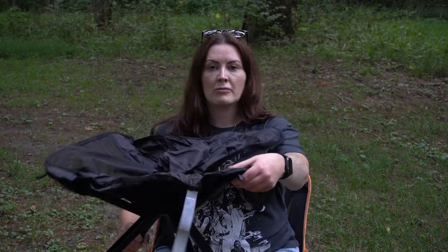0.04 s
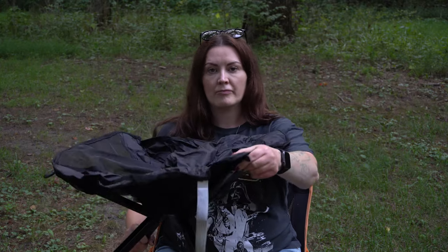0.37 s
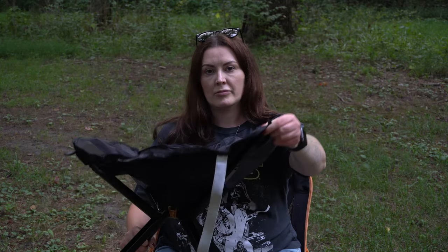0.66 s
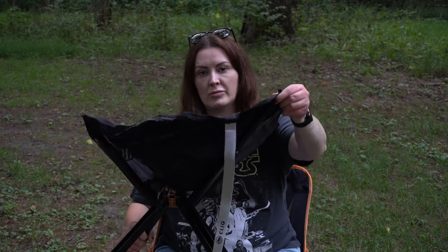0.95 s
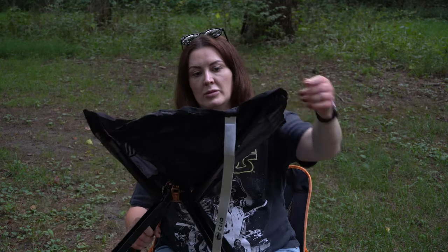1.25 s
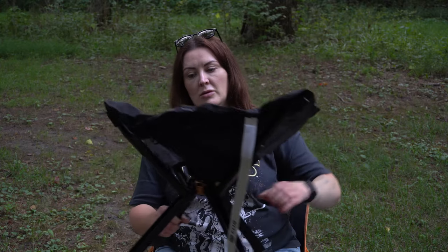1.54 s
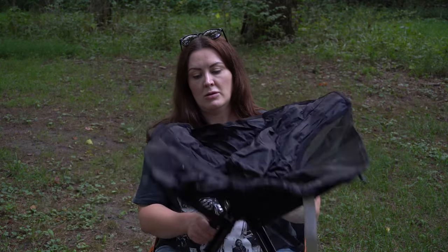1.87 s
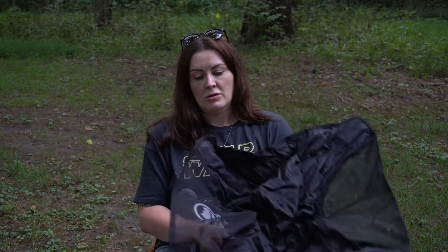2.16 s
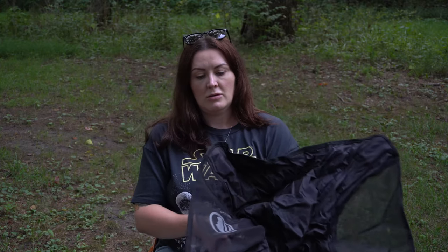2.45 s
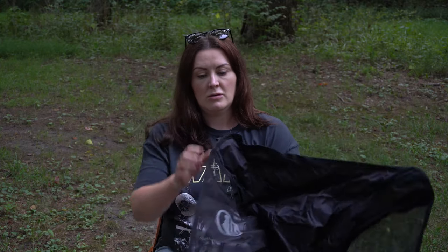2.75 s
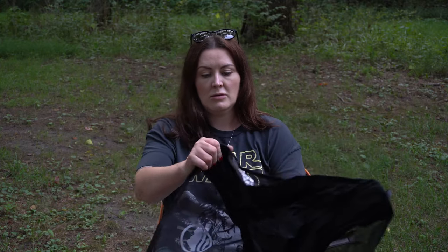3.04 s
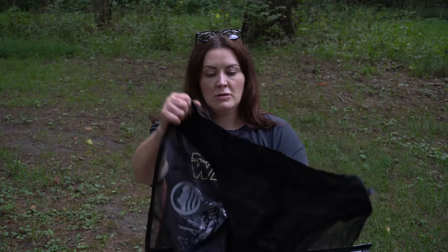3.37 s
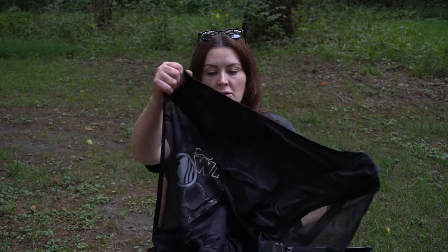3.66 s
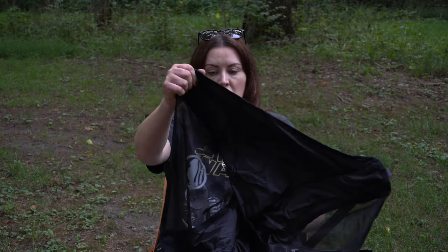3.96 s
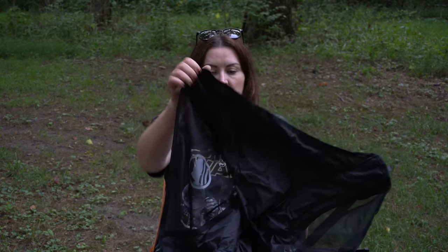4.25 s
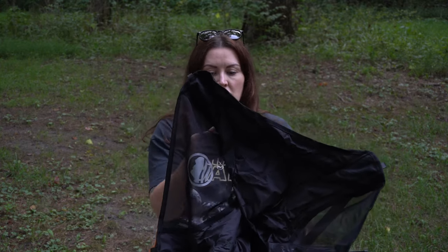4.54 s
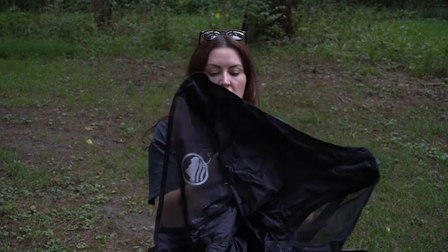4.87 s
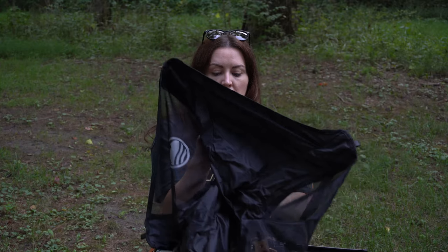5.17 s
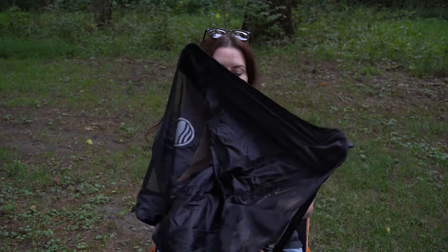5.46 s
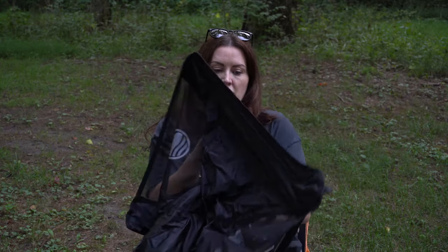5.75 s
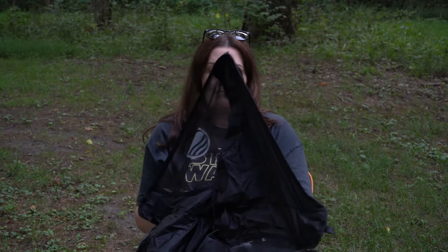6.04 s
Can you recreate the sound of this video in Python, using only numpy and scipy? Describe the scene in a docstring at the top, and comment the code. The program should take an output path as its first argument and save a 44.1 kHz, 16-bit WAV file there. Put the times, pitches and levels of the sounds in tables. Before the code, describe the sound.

Someone unfolds a camp chair outdoors, near the microphone. Its nylon seat crumples and hisses in short tugs while the hollow tubes knock. The joints lock with three sharp snaps, one early, one midway and one late, the last with a brief ring. Behind it, faint birdsong, a high ticking insect and a soft low rumble fill the woods, with a slight echo from the trees.

```python
"""Birds whistle and an insect ticks in phrases of six over the faint rumble of a forest clearing.
Close by, a folding camp chair is opened: each tug knocks a hollow tube and rustles the nylon seat.
Its joints snap home three times, and a few blows leave the long tubes ringing.
Trunks and leaves scatter the sounds back."""
import sys
import numpy as np
from scipy import signal
from scipy.fft import rfft, irfft
from scipy.io import wavfile
from scipy.ndimage import uniform_filter1d

SR = 44100
rng = np.random.default_rng(int(sys.argv[2]) if len(sys.argv) > 2 else 0)


def int16_out(signal):
    """Quantize to a 16-bit WAV file."""
    q = np.round(np.clip(np.atleast_2d(signal).T, -1, 1) * 32767)
    wavfile.write(sys.argv[1], SR, q.astype(np.int16))


N = 269451
TIME = np.arange(N) / SR


def amp(db):
    """Decibels to gain."""
    return 10 ** (np.asarray(db) / 20)


def unit(x):
    """Scale to rms 1."""
    return x / np.sqrt(np.mean(x ** 2) + 1e-20)


def read(points, hz):
    """Interpolate on a log-frequency axis."""
    points_hz, values = np.transpose(points)
    return np.interp(np.log(hz + 1), np.log(points_hz + 1), values)


def add(mix, time_s, sound):
    """Mix a sound in at time_s."""
    part = mix[max(round(time_s * SR), 0):][:len(sound)]
    part += sound[:len(part)]


def colour(x, spectrum):
    """Filter by a spectrum; rms 1."""
    hz = np.fft.rfftfreq(len(x), 1 / SR)
    return unit(irfft(rfft(x) * amp(read(spectrum, hz)), len(x)))


def drift(rate_hz):
    """Smooth random wander; rms 1."""
    width = max(int(SR / rate_hz), 1)
    return unit(uniform_filter1d(uniform_filter1d(rng.standard_normal(N), width), width))


def patchy(x, depth_db, size=512):
    """Patches of the spectrum, a few hundred hertz wide, come and go; rms 1."""
    bands = signal.stft(x, nperseg=size)[2]
    patches = uniform_filter1d(rng.standard_normal(bands.shape), size=4, axis=0)
    patches = unit(uniform_filter1d(patches, size=6, axis=1))
    return unit(signal.istft(bands * amp(depth_db * patches), nperseg=size)[1][:N])


# Hush and rumble spectra: (frequency [Hz], relative density [dB])
HUSH_SPECTRUM = [(100, -6), (200, 0), (400, -5.5), (800, -1.5), (1400, -11), (2400, -10), (3800, -14),
                 (5200, -25), (8000, -26.5), (12000, -29.5), (16000, -39)]
RUMBLE_SPECTRUM = [(20, -20.5), (40, -7), (62, 1.5), (95, 2.5), (125, -4.5), (170, -14), (300, -34),
                   (1000, -86.5)]
# Rumble envelope: (time [s], relative level [dB])
RUMBLE_ENVELOPE = [(0, -63.5), (1.05, -62.5), (1.22, -56), (1.5, -57), (2.6, -62), (2.8, -53), (3.0, -64),
                   (3.35, -53), (4.15, -59.5), (4.55, -50), (5.05, -59), (5.3, -57), (5.55, -63.5),
                   (5.85, -54), (6.1, -53.5)]


def air(hush_db=-70, rumble_gain_db=-3, lump_db=4.5):
    """The woods' wavering hush over a lumpy low rumble."""
    hush_gain = amp(hush_db + 1.2 * drift(rate_hz=2))
    hush = patchy(colour(rng.standard_normal(N), HUSH_SPECTRUM), depth_db=5.5, size=1024)
    gust_db = np.interp(TIME, *np.transpose(RUMBLE_ENVELOPE)) + lump_db * drift(rate_hz=26)
    rumble = colour(rng.standard_normal(N), RUMBLE_SPECTRUM)
    return hush_gain * hush + amp(rumble_gain_db + gust_db) * rumble


def whistle(length_s, first_hz, middle_hz, last_hz, waver):
    """Soft-edged tone; the fluttering pitch arches through three points."""
    progress = np.linspace(0, 1, max(int(length_s * SR), 8))
    arch_hz = np.polyval(np.polyfit([0, .5, 1], [first_hz, middle_hz, last_hz], 2), progress)
    flutter = waver * unit(uniform_filter1d(rng.standard_normal(len(progress)), size=120))
    phase = 2 * np.pi * np.cumsum(arch_hz * (1 + flutter)) / SR
    return unit(np.sin(phase) * np.sin(np.pi * progress))


# Slurred notes: (time [s], length [s], pitch [Hz], start above pitch [fraction], relative level [dB])
CAROL_NOTES = [(0, 0.029, 2727, 0.23, -52.5), (.104, 0.054, 2170, 0.21, -57), (.2, .07, 2694, -0.05, -54),
               (.413, 0.078, 2925, .02, -45), (.494, 0.096, 2478, -0.0034, -46.5),
               (.96, 0.12, 2170, 0.1, -58.5), (1.058, .058, 2917, 0.14, -55),
               (1.124, .069, 2143, 0.21, -51.5), (1.401, .039, 3314, 0.087, -55),
               (1.435, .033, 2756, 0.18, -52.5), (1.628, 0.046, 2507, 0.09, -56),
               (2.013, 0.068, 2960, 0.029, -57.5), (2.027, 0.051, 2500, 0.12, -56),
               (2.644, 0.057, 3400, 0.085, -53.5), (2.782, 0.042, 3047, 0.11, -50.5),
               (3.139, 0.097, 2496, 0.14, -50.5), (3.426, 0.078, 2884, -0.091, -51.5),
               (3.497, 0.0743, 2520, -0.063, -48), (4.039, 0.21, 2858, -0.094, -51.5),
               (4.165, 0.13, 2452, 0.035, -46), (4.666, 0.057, 3313, 0.12, -52),
               (4.694, 0.054, 2937, .1, -45.5), (4.756, 0.12, 2345, 0.091, -48.5),
               (4.874, 0.11, 2008, 0.016, -60.5), (5.148, .06, 2340, .1, -52.5),
               (5.226, 0.088, 2753, -.13, -49), (5.78, 0.053, 2194, -0.12, -68)]


def carolling_bird(overshoot=.23):
    """A songbird slides onto each pitch and levels off just past it."""
    out = np.zeros(N)
    for time_s, length_s, hz, slide, db in CAROL_NOTES:
        note = whistle(length_s, hz * (1 + slide), hz, hz * (1 - overshoot * slide), waver=.028)
        add(out, time_s, amp(db) * note)
    return out


# Calls: (time [s], relative level [dB])
CALLS = [(.058, -54.5), (1.095, -57), (1.3, -60), (1.492, -63), (2.045, -58), (2.318, -62.5)]
# Parts of a call: (delay [s], length [s], first [Hz], middle [Hz], last [Hz], relative level [dB])
CALL_PARTS = [(0, 0.043, 5300, 3918, 3169, -2.5), (0.059, .03, 3380, 3910, 4337, -5.5)]


def calling_bird():
    """A second bird repeats one call: sweep down, flick up."""
    out = np.zeros(N)
    for time_s, db in CALLS:
        for delay_s, length_s, *pitches_hz, part_db in CALL_PARTS:
            add(out, time_s + delay_s, amp(db + part_db) * whistle(length_s, *pitches_hz, waver=.011))
    return out


# Bouts of phrases: (start [s], end [s], phrase period [s], stroke period [s])
INSECT_BOUTS = [(.059, .45, .156, .0221), (.504, 3.05, .1539, .0221), (3.134, 6.11, .1638, .0234)]


def insect(stroke_db=-70, strokes=6):
    """Phrases of wing strokes, each a falling chirp; the last bout is a little slower."""
    out = np.zeros(N)
    for start_s, end_s, phrase_s, stroke_s in INSECT_BOUTS:
        for time_s in np.arange(start_s, end_s, phrase_s):
            for k, jitter_db in enumerate(rng.standard_normal(strokes)):
                chirp = whistle(length_s=.0155, first_hz=6480, middle_hz=6480, last_hz=5750, waver=.006)
                onset_s = time_s + k * stroke_s - len(chirp) / SR / 2
                add(out, onset_s, amp(stroke_db + jitter_db) * chirp)
    return out


# Echo spectrum, mostly treble off the leaves: (frequency [Hz], relative level [dB])
ECHO_SPECTRUM = [(200, -19.5), (1000, -2.5), (2500, -2), (4000, -7.5), (5200, -3.5), (6500, 4.5),
                 (7600, 0.5), (9300, 6.5), (11000, -4.5), (15000, 2)]
# Echo decay: (frequency [Hz], t60 before stretch [s])
ECHO_DECAY = [(200, 0.23), (1500, 0.14), (4000, 0.39), (7000, 0.22), (9500, 0.3), (11500, 0.41),
              (15500, 0.16)]


def trees(x, build_s, stretch, trunk_gain=0, trunk_s=.041, echoes_per_s=5000):
    """Echoes off trunks and leaves build, then die band by band; trunk_gain adds the nearest trunk."""
    t = np.arange(SR) / SR
    swell = np.minimum(.25 + t / build_s, 1)
    trunk = trunk_gain * np.exp(-((t - trunk_s) / .003) ** 2)
    taps = (swell + trunk) * rng.standard_normal(SR) * (rng.random(SR) < echoes_per_s / SR)
    hz, delay_s, bands = signal.stft(taps, SR, nperseg=256)
    t60_s = stretch * read(ECHO_DECAY, hz)[:, None]
    bands *= amp(read(ECHO_SPECTRUM, hz)[:, None] - 60 * delay_s / t60_s)
    tail = signal.istft(bands, SR, nperseg=256)[1]
    return signal.fftconvolve(x, tail / np.linalg.norm(tail))[:N]


BLOW_SAMPLES = 8192
BLOW_HZ = np.fft.rfftfreq(BLOW_SAMPLES, 1 / SR)


def blow(t60_s, spectrum_db, attack_s):
    """Burst of contact chatter, coloured by the struck part's spectrum over BLOW_HZ."""
    t = np.arange(BLOW_SAMPLES) / SR
    envelope = amp(-60 * t / t60_s) * (1 - np.exp(-t / attack_s))
    envelope /= envelope.max()
    chatter = rng.standard_normal(BLOW_SAMPLES)
    for _ in range(3):  # hard contacts drive all frequencies alike
        flat_spectrum = np.exp(1j * np.angle(rfft(chatter * envelope)))
        chatter = irfft(flat_spectrum) / np.maximum(envelope, .1)
    log_gain = np.log(amp(np.maximum(spectrum_db, spectrum_db.max() - 80)))
    mirrored = np.r_[log_gain, log_gain[-2:0:-1]]
    minimum_phase = np.exp(np.conj(signal.hilbert(mirrored)))[:len(BLOW_HZ)]
    sound = irfft(rfft(chatter * envelope) * minimum_phase)
    return sound * np.linalg.norm(envelope) / np.linalg.norm(sound)


# Hollow tube resonances: (centre [Hz], width [Hz], lift [dB])
TUBE_RESONANCES = [(1100, 150, 8), (2000, 1200, 6), (2600, 79, 4.5), (3850, 1200, 7)]


def knock_spectrum_db(low_hz, high_hz):
    """The band a contact excites, lifted by the hollow tube's resonances."""
    band_db = -10 * np.log10((1 + (low_hz / (BLOW_HZ + 1)) ** 6) * (1 + (BLOW_HZ / high_hz) ** 13))
    return band_db + sum(lift_db / (1 + (2 * (BLOW_HZ - centre_hz) / width_hz) ** 2)
                         for centre_hz, width_hz, lift_db in TUBE_RESONANCES)


# Tugs, each a knock and a rustle; relative levels: (time [s], knock [dB], knock t60 [s],
# knock low edge [Hz], knock high edge [Hz], rustle length [s], crumple [dB], hiss [dB])
CHAIR_TUGS = [(0.246, -40.5, 0.027, 1970, 3900, .03, -52, -80),
              (0.606, -48.5, 0.035, 280, 397, 0.019, -71, -72),
              (0.6508, -9.5, 0.0057, 556, 3610, 0.047, -37, -45.5),
              (1.254, -54.5, 0.055, 300, 520, 0.036, -70, -87),
              (1.7671, -36, 0.017, 1000, 2770, 0.12, -62, -82),
              (2.162, -42.5, 0.023, 2480, 6200, 0.033, -64, -49),
              (2.2151, -31.5, 0.064, 2235, 6200, .03, -59, -30),
              (2.295, -33, 0.03, 2216, 4500, 0.033, -53, -52.5),
              (2.524, -53, 0.066, 280, 560, .06, -68, -84.5),
              (2.602, -32, 0.027, 1296, 3500, 0.099, -46, -77.5),
              (2.7353, -34.5, 0.013, 900, 3000, .04, -62.5, -82.5),
              (2.9878, -24.5, .016, 1735, 3430, 0.068, -48.5, -75),
              (3.196, -32.5, 0.032, 2300, 6500, 0.046, -40.5, -43.5),
              (3.258, -35, 0.013, 1500, 4070, .02, -48, -45),
              (3.3112, -22.5, 0.02, 635, 4400, 0.053, -40.5, -40),
              (3.546, -32.5, 0.0051, 905, 4500, 0.049, -41, -49),
              (3.56, -25, 0.011, 600, 3660, 0.051, -39.5, -58),
              (3.7453, -35.5, 0.014, 2413, 4200, .07, -57.5, -85.5),
              (4.029, -36.5, 0.01073, 836, 2340, 0.19, -63.5, -85.5),
              (4.253, -25, 0.022, 2163, 5520, .02, -45, -42),
              (4.58, -34, 0.015, 1210, 5500, 0.047, -42.5, -44.5),
              (4.675, -46.5, 0.0096, 700, 2950, 0.1, -58.5, -84),
              (4.972, -41.5, 0.044, 3570, 6760, 0.075, -67, -60),
              (5.074, -32, .014, 1540, 4760, 0.044, -55, -69),
              (5.161, -44.5, 0.04, 2200, 5000, 0.089, -54.5, -72),
              (5.272, -27, 0.0071, 1350, 4130, 0.11, -47, -73.5)]


def tube_knocks(gain_db=1.5, bounce_s=.0039, bounce_db=-7, hard_db=-27.5):
    """Each tug knocks a tube, which bounces once; below hard_db the bounce falls away."""
    out = np.zeros(N)
    for time_s, db, t60_s, low_hz, high_hz, *_ in CHAIR_TUGS:
        spectrum_db = knock_spectrum_db(low_hz, high_hz)
        rebound_db = bounce_db + min(db - hard_db, 0)
        for delay_s, drop_db in (0, 0), (bounce_s, rebound_db):
            knock = blow(t60_s, spectrum_db, attack_s=.0093 * t60_s)  # cloth cushions longer knocks
            add(out, time_s + delay_s, amp(db + gain_db + drop_db) * knock)
    return out


def crackle(slips_per_s, spread_db, rubbing):
    """Tiny slips of very unequal size over smooth rubbing."""
    sizes = amp(spread_db * np.minimum(rng.exponential(1, N), 4)) * rng.choice([-1, 1], N)
    slips = unit(sizes * (rng.random(N) < slips_per_s / SR))
    return slips + rubbing * rng.standard_normal(N)


def pull_envelope(peak_s, length_s, rise_share=.38, edge_db=-14):
    """Effort of one pull on the cloth: quick swell, slower fade."""
    side_s = length_s * np.where(TIME < peak_s, rise_share, 1 - rise_share)
    return amp(edge_db * (abs(TIME - peak_s) / side_s) ** 1.4)


# Crumpling folds and hissing weave: (frequency [Hz], relative density [dB])
FOLD_SPECTRUM = [(100, -32), (200, -18.5), (300, 7), (420, -2.5), (560, 0), (900, -1), (1500, 2.5),
                 (2500, 0), (3800, 0), (5000, -18.5), (9000, -34), (16000, -54)]
WEAVE_SPECTRUM = [(1500, -15), (3500, 11.5), (5000, 3.5), (7000, 0.5), (9000, -3.5), (12000, -9),
                  (16000, -13.5)]
# Cloth sliding over the tubes, no knock: (peak time [s], length [s], crumple [dB], hiss [dB])
CLOTH_SLIDES = [(.29, .12, -62.5, -68), (.53, 0.81, -65.5, -59), (.642, 0.018, -44, -39),
                (.798, .04, -50, -53), (2.04, 0.17, -62, -86), (2.25, 0.11, -47.5, -44.5),
                (2.77, .09, -50, -83), (3.03, 0.095, -51.5, -52.5), (3.288, 0.15, -37.5, -44),
                (3.375, 0.2, -46, -51), (3.512, 0.17, -41.5, -62.5), (4.275, 0.13, -50, -53.5),
                (4.514, 0.069, -44.5, -59), (4.572, 0.046, -45, -43.5), (5.048, 0.075, -41, -56.5),
                (5.484, 0.091, -51, -49), (6.05, .06, -53.5, -63)]


def nylon_seat(clump_db=3, settle_s=.008):
    """Folds crumple and the weave hisses in clumps; on a tug the cloth settles just after the knock."""
    folds = colour(crackle(slips_per_s=600, spread_db=2.5, rubbing=.45), FOLD_SPECTRUM)
    folds = patchy(folds, depth_db=4)
    weave = colour(crackle(slips_per_s=1400, spread_db=5, rubbing=.6), WEAVE_SPECTRUM)
    weave = patchy(weave, depth_db=3)
    out = np.zeros(N)
    for pulls, lag_s in (CHAIR_TUGS, settle_s), (CLOTH_SLIDES, 0):
        for time_s, *_, length_s, crumple_db, hiss_db in pulls:
            rustle = amp(crumple_db) * folds + amp(hiss_db) * weave
            out += pull_envelope(time_s + lag_s, length_s) * rustle
    return out * amp(clump_db * np.tanh(drift(rate_hz=58)))  # cloth catches and lets go


# Chip contour: (time [s], pitch [Hz])
CHIP_PITCH = [(0.263, 1880), (0.269, 2596), (0.28, 2750), (.29, 2641), (.306, 2263)]
# Chip harmonics: (harmonic number, relative level [dB])
CHIP_HARMONICS = [(1, -47), (2, -37), (3, -65)]


def chipping_bird(waver=.012):
    """A nearer bird gives one hooked, slightly rough note, second harmonic strongest."""
    times_s, hz = np.transpose(CHIP_PITCH)
    t = np.arange(times_s[0], times_s[-1], 1 / SR)
    flutter = waver * unit(uniform_filter1d(rng.standard_normal(len(t)), size=60))
    phase = 2 * np.pi * np.cumsum(np.interp(t, times_s, hz) * (1 + flutter)) / SR
    swell = np.hanning(len(t)) ** .25
    out = np.zeros(N)
    for harmonic, db in CHIP_HARMONICS:
        add(out, times_s[0], amp(db) * unit(swell * np.sin(harmonic * phase)))
    return out


# One spectrum per joint: (frequency [Hz], relative density [dB])
JOINT_SPECTRA = [
    [(120, -61), (200, -45), (550, -23.5), (1840, -13.5), (2130, -20), (2800, -8), (3360, -8), (3550, -1.5),
     (4030, 1), (4750, -10), (6600, -1), (8060, -11.5), (9490, -8.5), (11600, -15.5), (13700, -14),
     (15500, -16)],
    [(120, -68.5), (200, -26), (575, -14.5), (940, -11), (2210, -5), (2510, -11.5), (3070, 2), (3490, -12),
     (3890, -1), (5600, -21), (6130, -12), (8060, -16), (8830, -10), (10800, -20), (15500, -12)],
    [(120, -53.5), (200, -46.5), (525, -14.5), (975, -21), (1540, -7.5), (2170, -9), (3130, -13.5),
     (3680, 1.5), (4030, -8), (4420, -7), (4840, -11.5), (9320, -10.5), (11400, -25), (12500, -15.5),
     (15500, -28)],
]
# Locking contacts: (time [s], relative level [dB], t60 [s], joint index)
JOINT_SNAPS = [(0.8024, -15, 0.0038, 0), (0.8039, -0.5, 0.013, 0), (3.351, -17.5, 0.065, 1),
               (3.3568, -7, 0.019, 1), (3.375, -28, .02, 1), (5.4817, -18.5, 0.0073, 2),
               (5.4917, -6, 0.025, 2), (5.4953, -11.5, 0.008, 2), (5.5097, -24, 0.033, 0),
               (5.531, -30, 0.006, 0)]


def joint_snaps(gain_db=2):
    """The joints lock in three clusters of hard contacts."""
    out = np.zeros(N)
    for time_s, db, t60_s, joint in JOINT_SNAPS:
        snap = blow(t60_s, read(JOINT_SPECTRA[joint], BLOW_HZ), attack_s=.00021)
        add(out, time_s, amp(db + gain_db) * snap)
    return out


# Long tube modes: (frequency [Hz], relative level [dB], t60 [s])
TUBE_MODES = [(850, -10, 0.2), (2630, -0.5, 0.08), (4125, -2, 0.03), (5980, -18.5, .16), (6866, -28, .16),
              (8730, -22.5, 0.18), (8800, -15, .2)]
# Blows that excite them: (time [s], level [dB])
RING_BLOWS = [(2.218, -64), (5.4803, -26.5), (5.4909, -23.5)]


def tube_rings():
    """Struck long tubes ring on in decaying modes."""
    t = np.arange(SR // 2) / SR
    ring = sum(amp(db - 60 * t / t60_s) * np.sin(2 * np.pi * hz * t) for hz, db, t60_s in TUBE_MODES)
    out = np.zeros(N)
    for time_s, db in RING_BLOWS:
        add(out, time_s, amp(db) * ring)
    return out


def scene(flutter_db=3.5):
    """Chair near and almost dry; birds and insect far among the trees."""
    frame = joint_snaps() + tube_knocks() + tube_rings()
    cloth = nylon_seat()
    song = carolling_bird() + calling_bird() + chipping_bird()
    song *= amp(flutter_db * drift(rate_hz=140))
    chirps = insect()
    chair_echo = trees(frame + amp(-9.5) * cloth, build_s=.05, stretch=1.3, trunk_gain=1.1)
    chair = frame + cloth + amp(-16) * chair_echo
    birds = amp(-4.5) * song + amp(.5) * trees(song, build_s=.012, stretch=1.7, trunk_gain=1.3)
    ticking = chirps + amp(-12) * trees(chirps, build_s=.03, stretch=1.1)
    return (chair + birds + ticking + air())[None]


def record(dry, ceiling=.92, cutoff_hz=15800):
    """The hardest snaps overload the input; a low-pass follows."""
    clipped = np.clip(dry, -ceiling, ceiling)
    lowpass = signal.firwin(511, cutoff_hz, window=("kaiser", 9), fs=SR)
    return signal.oaconvolve(clipped, lowpass[None], "same")


dry = scene()
out = record(dry)
int16_out(out)
```